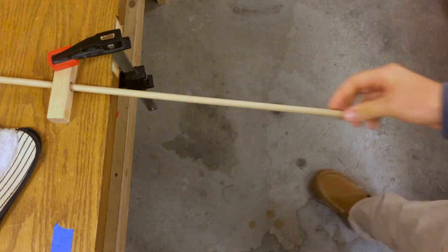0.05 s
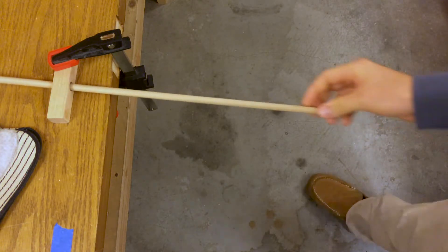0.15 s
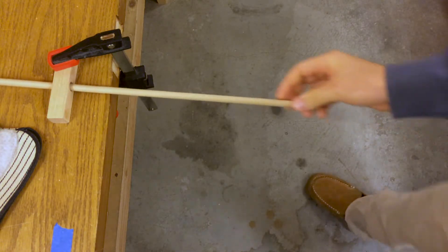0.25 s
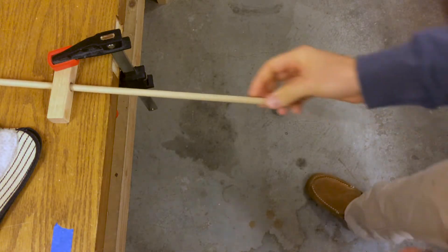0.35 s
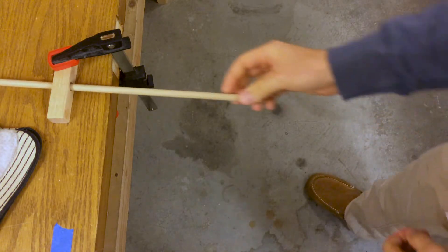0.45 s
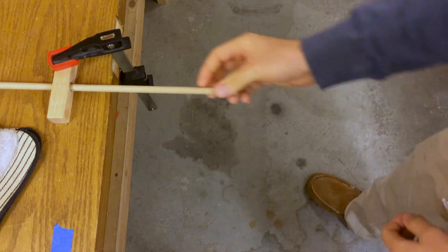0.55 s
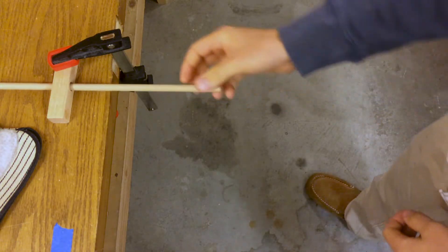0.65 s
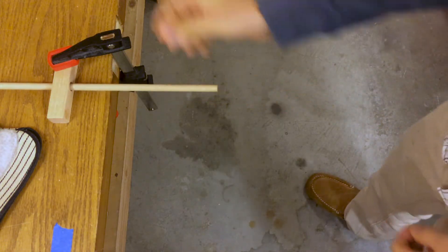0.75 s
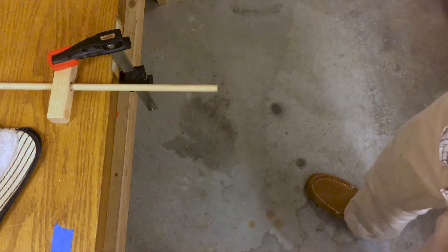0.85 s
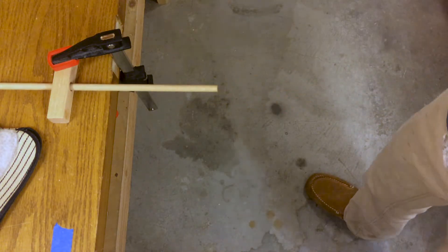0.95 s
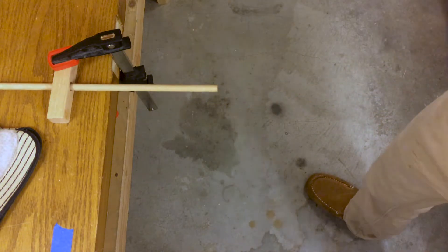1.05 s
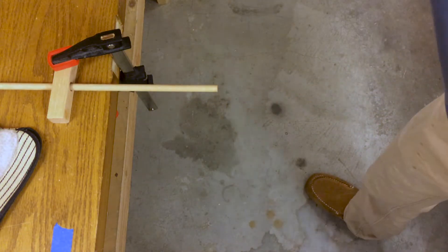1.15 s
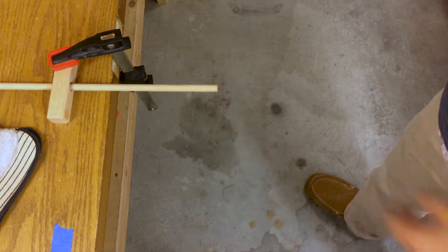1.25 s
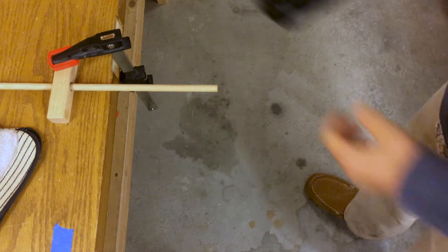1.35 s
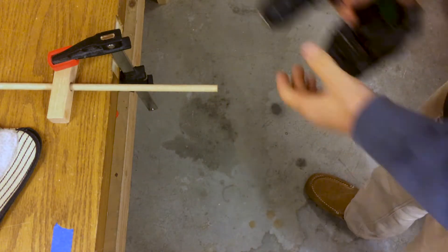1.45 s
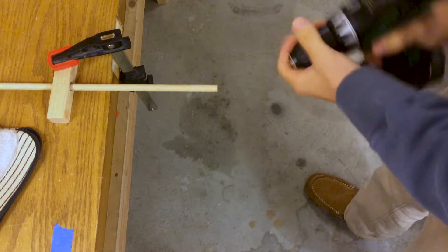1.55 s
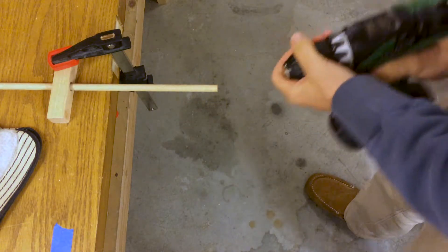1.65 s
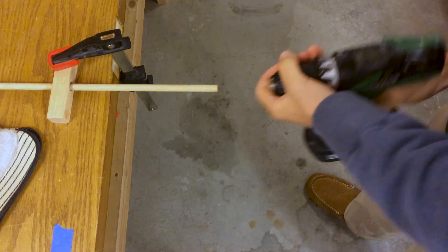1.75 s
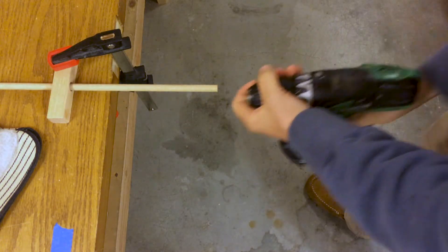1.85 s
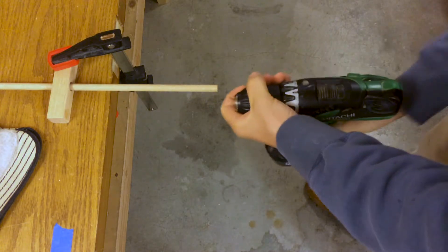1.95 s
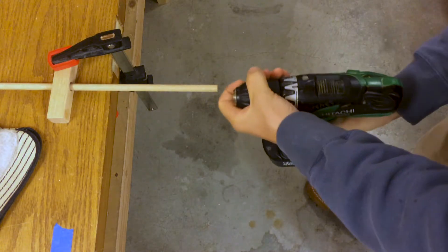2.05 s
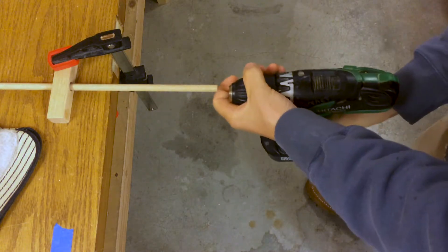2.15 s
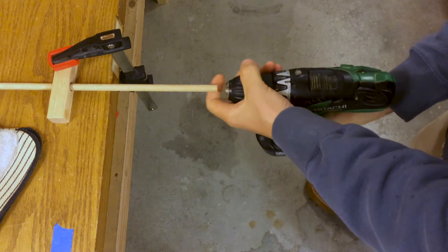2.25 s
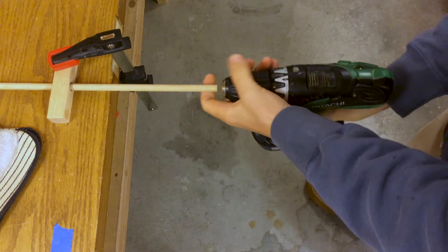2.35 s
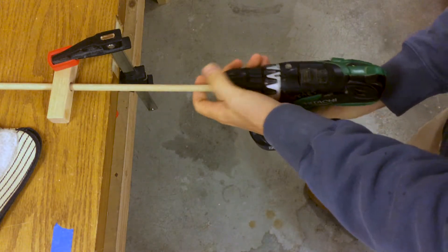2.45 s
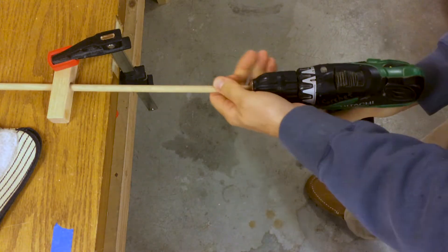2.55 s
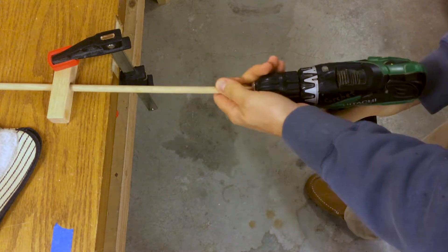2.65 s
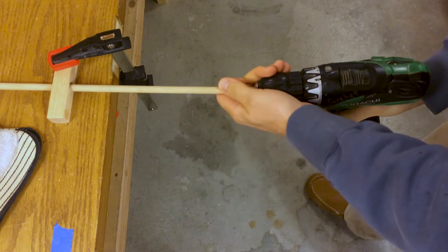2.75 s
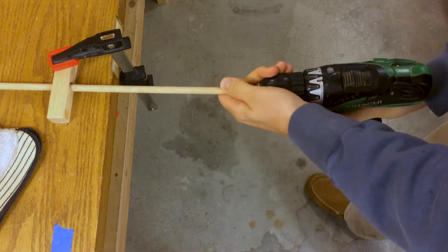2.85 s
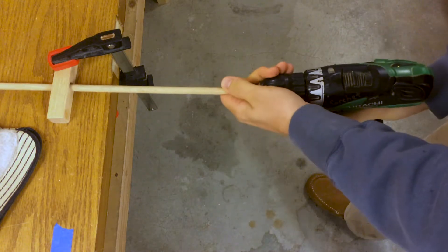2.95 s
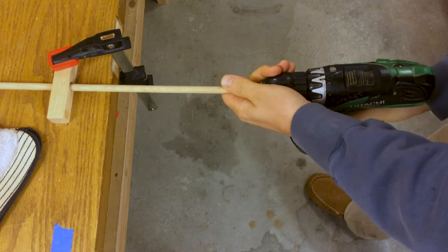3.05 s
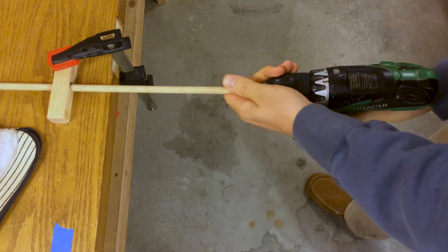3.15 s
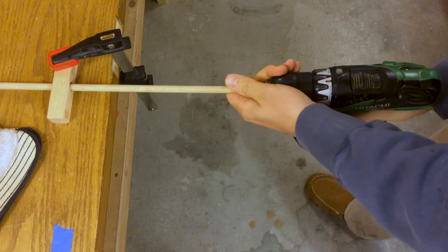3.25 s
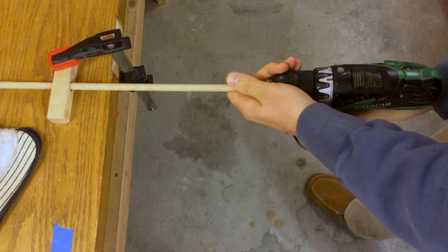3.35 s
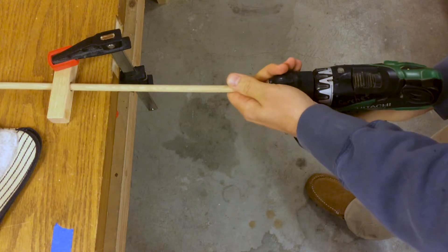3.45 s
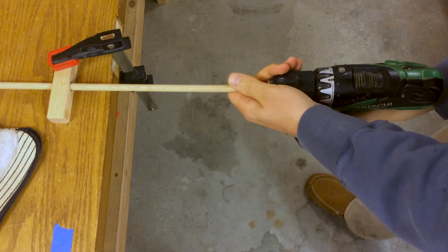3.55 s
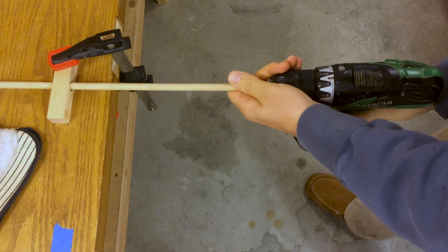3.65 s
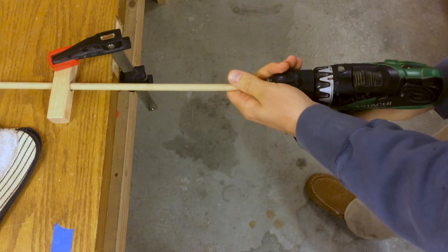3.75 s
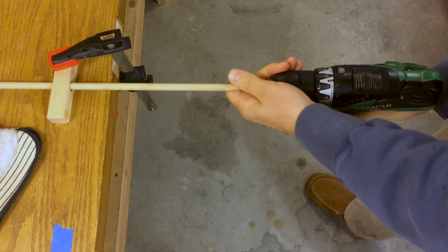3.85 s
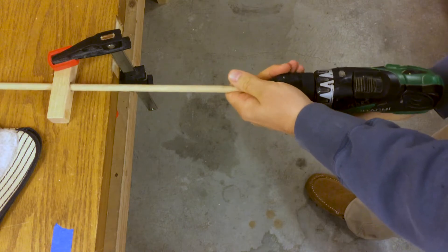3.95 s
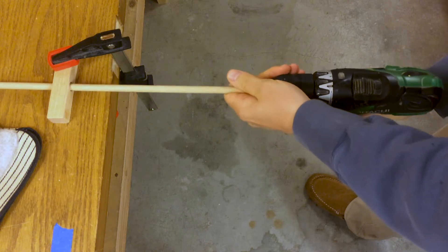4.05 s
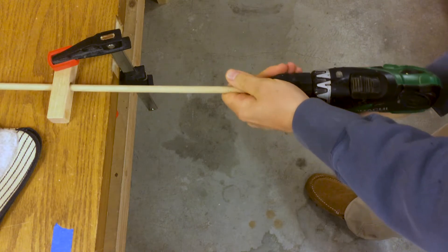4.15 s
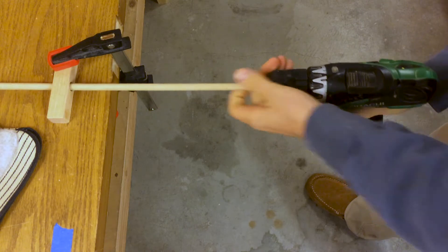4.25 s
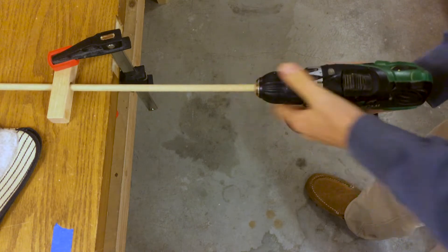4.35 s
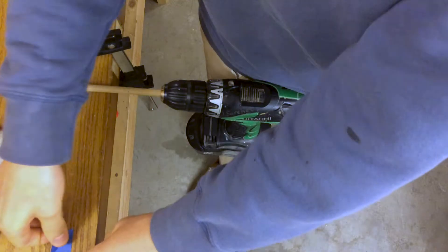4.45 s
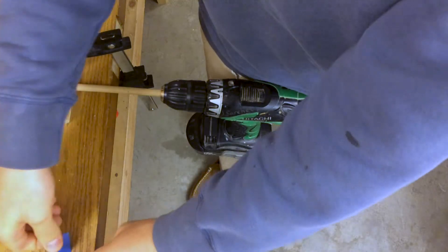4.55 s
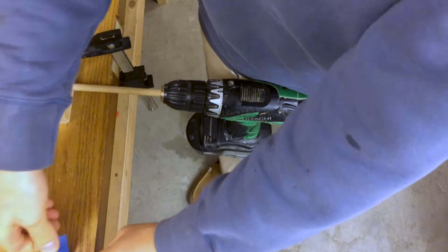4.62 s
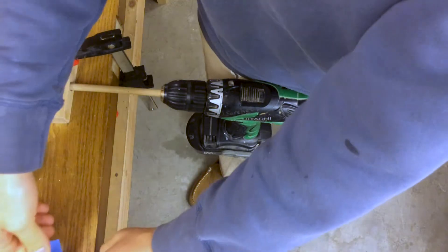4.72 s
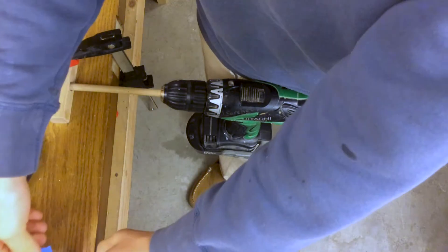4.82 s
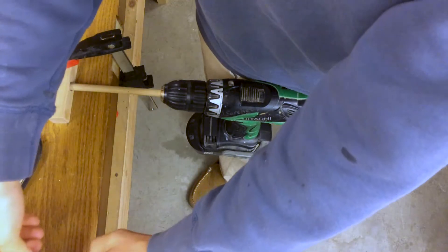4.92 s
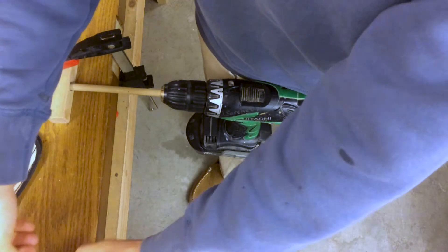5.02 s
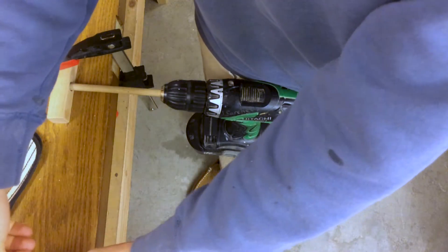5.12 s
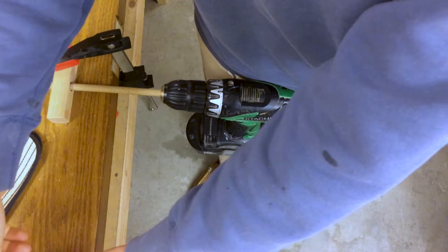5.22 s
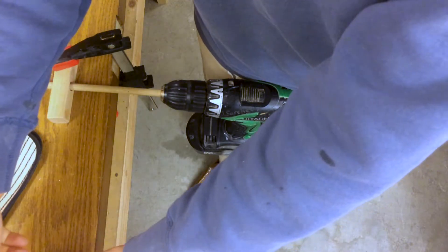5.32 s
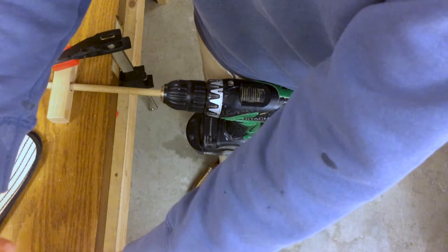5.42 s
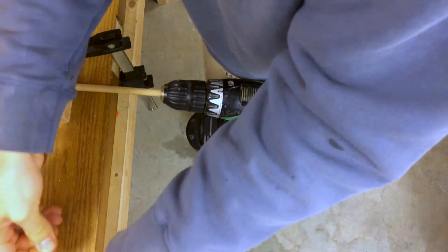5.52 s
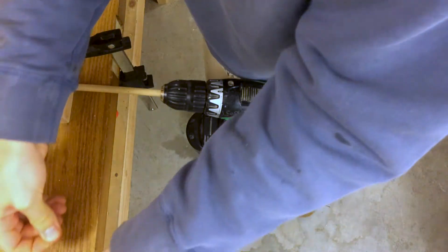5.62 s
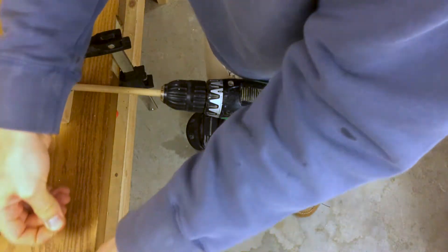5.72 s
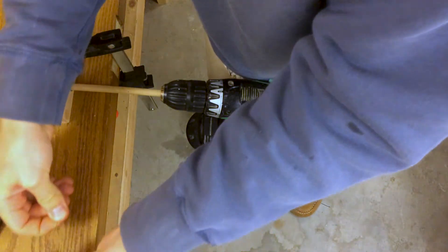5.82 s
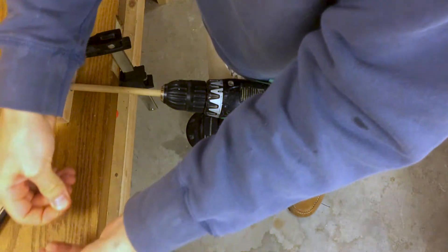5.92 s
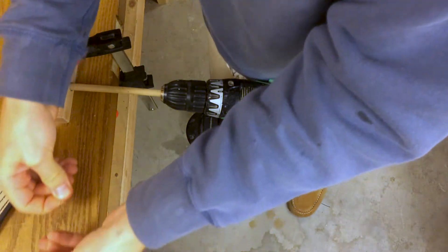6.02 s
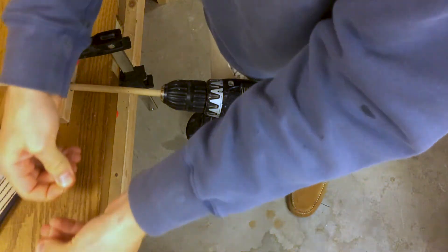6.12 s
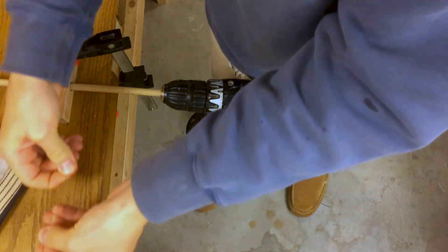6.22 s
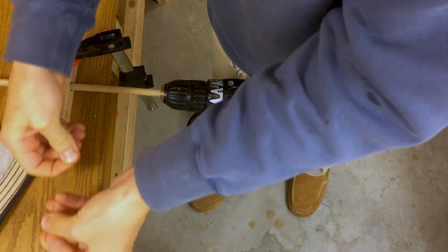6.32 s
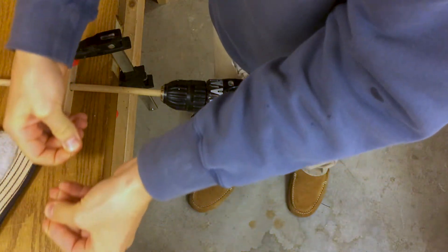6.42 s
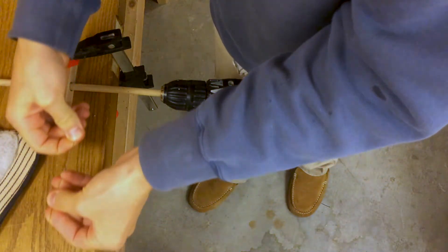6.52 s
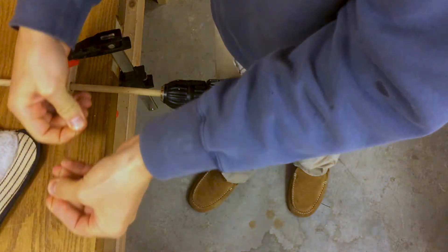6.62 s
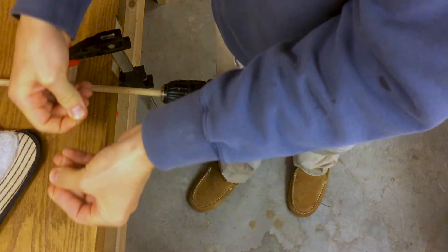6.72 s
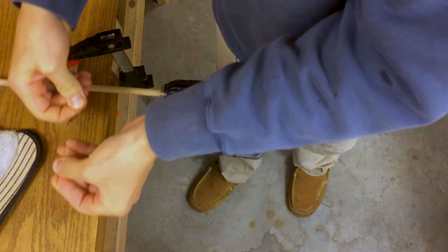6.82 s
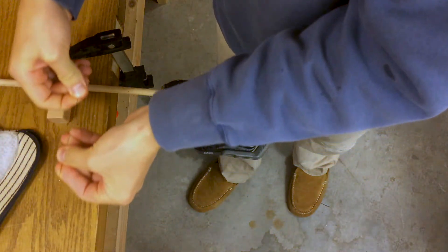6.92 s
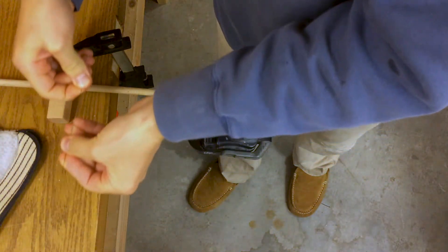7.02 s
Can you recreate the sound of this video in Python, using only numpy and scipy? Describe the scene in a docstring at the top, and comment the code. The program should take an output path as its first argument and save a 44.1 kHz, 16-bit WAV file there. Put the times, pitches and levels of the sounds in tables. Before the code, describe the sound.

Close in a small workshop with faint air and low rumble: a thin dowel scrapes through a wooden block with a wavering, hollow squeak and knocks dryly to a stop. A drill is lifted with a soft thud and sharp plastic clacks. It whirs briefly, clicks, then runs about a second, sagging to a shuddering stall with a short falling squeal. Tape and sleeves rustle and tick quietly.

```python
"""A small workshop: air noise, low rumble and, for a while, the throb of a distant slow machine.
A dowel slides through a clamped block (noise through wood resonances) and knocks home (crack and ringing modes).
A cordless drill is picked up with a thud and clacks, and runs twice (shaped gear roar, brush fuzz, whining lines).
The second run sags under load as the chuck grips the dowel, shaking and squealing; brief rubs come before the
runs, and tape and sleeves rustle and tick afterwards (grainy bands of noise, short bursts)."""
import sys
import numpy as np
from scipy import signal
from scipy.fft import rfft, irfft
from scipy.io import wavfile
from scipy.ndimage import uniform_filter1d

SR = 44100
rng = np.random.default_rng(int(sys.argv[2]) if len(sys.argv) > 2 else 0)


def generate_wav(signal):
    """Clip the signal to [-1, 1] and save it as 16-bit WAV at the path in sys.argv[1]."""
    frames = np.transpose(np.atleast_2d(signal))
    scaled = np.clip(frames, -1, 1) * 32767
    pcm = np.round(scaled).astype(np.int16)
    wavfile.write(sys.argv[1], SR, pcm)


N = 312228  # samples


def gain_of(db):
    """Decibels to amplitude."""
    return 10 ** (np.asarray(db) / 20)


def evened(x):
    """Scales to rms 1."""
    return x / np.sqrt(np.mean(x ** 2) + 1e-20)


def blend(share, a, b):
    """From a to b as the share goes from 0 to 1."""
    return a + (b - a) * np.clip(share, 0, 1)


def read(points, hz):
    """Reads a curve of (f/Hz, value) points along log frequency."""
    f, value = np.transpose(points)
    return np.interp(np.log(hz + 1), np.log(f + 1), value)


def add(mix, start_s, sound):
    """Mixes a sound in from its start time."""
    part = mix[round(start_s * SR):][:len(sound)]
    part += sound[:len(part)]


def play(rows):
    """Start time, columns drawn out to sample rate, and a window with 4 ms edges."""
    s, *columns = np.transpose(rows)
    t = np.arange(s[0], s[-1], 1 / SR)
    edge = np.clip(np.minimum(t - s[0], s[-1] - t) / .004, 0, 1)
    return s[0], [np.interp(t, s, column) for column in columns], edge


def drift(size, rate):
    """Slow random wander of rms 1, changing about rate times a second."""
    b, a = signal.butter(2, rate / SR)
    wander = signal.lfilter(b, a, rng.standard_normal(size + SR))
    return evened(wander[SR:])  # the filter has settled by here


def band_rms(x, lo_hz, hi_hz):
    """Level of x inside a band."""
    hz = np.fft.rfftfreq(len(x), 1 / SR)
    inside = (hz > lo_hz) & (hz < hi_hz)
    return np.linalg.norm(rfft(x)[inside]) * np.sqrt(2) / len(x)


def coloured(x, spectrum, bumps=()):
    """Gives x a spectrum with resonant bumps (f/Hz, width/Hz, height/dB), rms 1."""
    hz = np.fft.rfftfreq(len(x), 1 / SR)
    db = read(spectrum, hz)
    db = db + sum(height / (1 + (2 * (hz - f) / width) ** 2) for f, width, height in bumps)
    return evened(irfft(rfft(x) * gain_of(db), len(x)))


def grains(size, spread_db, rate):
    """Noise whose level jumps about quickly, as from teeth or fibres catching."""
    return rng.standard_normal(size) * gain_of(spread_db * drift(size, rate))


def resonate(x, hz, width):
    """A resonance of gain 1 that may move: shift down to 0 Hz, smooth, shift back up."""
    turn = np.exp(2j * np.pi * np.cumsum(hz * np.ones(len(x))) / SR)
    r = np.exp(-np.pi * width / SR)
    smooth = signal.lfilter([1 - r], [1, -r], x / turn + 1e-18)
    return 2 * (turn * smooth).real


def whistle(x, hz, width):
    """Noise through the same resonance twice for steep sides, rms 1."""
    return evened(resonate(resonate(x, hz, width), hz, width))


def steady(x):
    """Evens out the deepest swells of a ringing mode: friction keeps feeding it."""
    return evened(x / (uniform_filter1d(x ** 2, size=600) + .05) ** 0.17)


def orders(hz, multiples, levels_db, flutter_db, scatter=1):
    """Sines on multiples of a turning speed, each fluttering; little scatter of phase makes a beat each turn."""
    turns = np.cumsum(hz) / SR
    total = 0
    for k, db in zip(multiples, levels_db):
        level = np.sqrt(2) * gain_of(db + flutter_db * drift(len(hz), 61))
        total = total + level * np.cos(2 * np.pi * (k * turns + scatter * rng.random()))
    return total


def tone(rows):
    """A single gliding, fluttering sine."""
    s, (hz, db), edge = play(rows)
    return s, edge * orders(hz, [1], [db], flutter_db=2)


# Dowel sliding: t/s, f of lowest bending mode/Hz, bending level/dB, scrape level/dB, block ringing level/dB
SLIDE = [(0.0, 443, -62, -81, -58), (0.044, 410.5, -64, -51, -59), (0.104, 379, -53.5, -59.5, -56.5),
         (0.198, 505, -60, -60, -58.5), (0.252, 509, -60, -56.5, -62.5), (0.34, 535, -62.5, -58.5, -61.5),
         (0.46, 475, -53, -59, -57), (0.508, 451, -58, -54, -56.5), (0.558, 423, -70, -56, -61.5),
         (0.608, 394, -70, -59, -66.5), (0.63, 394, -72, -77, -65)]
# Bending modes: multiple of the lowest, level/dB
BEND_MODES = [(1, -1.5), (1.9, -3), (2.3, -16)]
# Block resonances: f/Hz, width/Hz, level/dB
BLOCK = [(729, 115, 0), (874, 20, 2), (1044, 160, -3), (1158, 110, -4.5), (1479, 39, -7.5), (1876, 19, -16)]
# Upper modes: f/Hz, width before widening/Hz, level over the scrape/dB
UPPER = [(2490, 33, -14.5), (2856, 34, -22), (3300, 50, -18.5), (3705, 40, -12.5), (4360, 52, -13),
         (4820, 140, -18), (5340, 75, -26), (6400, 82, -28), (6970, 70, -25), (7860, 89, -25),
         (8720, 79, -23), (9800, 120, -34), (12100, 140, -29)]
# Scrape spectrum: f/Hz, relative level per Hz/dB
SCRAPE = [(710, -32), (1200, -9), (1910, 1.5), (2040, -6.5), (4240, -5), (5090, -12), (9020, -12),
          (12300, -19), (15800, -40)]
WAVER_DB, UPPER_WAVER_DB = 2.5, 3.5  # rms level wander of each mode
UPPER_WIDENING = 1.9


def slide():
    """Friction shakes dowel and block: the bending modes glide together with the free length;
    the block and upper modes waver with the grip."""
    s, (hz, bend_db, scrape_db, block_db), edge = play(SLIDE)
    size = len(hz)
    rub = grains(size, spread_db=2.0, rate=130)
    bend, block, upper = np.zeros((3, size))
    for k, db in BEND_MODES:
        level = gain_of(db + WAVER_DB * drift(size, 41))
        bend += level * steady(whistle(rub, k * hz, 21))
    for f, width, db in BLOCK:
        level = gain_of(db + WAVER_DB * drift(size, 33))
        pitch = f * (1 + 0.0194 * drift(size, 15.7))
        block += level * steady(whistle(rub, pitch, width))
    for f, width, db in UPPER:
        level = gain_of(db + UPPER_WAVER_DB * drift(size, 19))
        pitch = f * (1 + 0.012 * drift(size, 11.3))
        upper += level * whistle(rub, pitch, UPPER_WIDENING * width)
    scrape = upper + coloured(rub, SCRAPE)
    return s, edge * (gain_of(bend_db) * bend + gain_of(block_db) * block + gain_of(scrape_db) * scrape)


# Room air: t/s, murmur level/dB, hiss level/dB
AIR = [(0, -62, -60), (.6, -67.5, -101), (1.0, -75, -73.5), (1.25, -68.5, -69.5), (1.45, -72.5, -73.5),
       (1.9, -71, -71), (2.52, -72.5, -77), (2.851, -67, -74), (3.1, -71, -73.5), (4.25, -59, -62),
       (4.451, -70.5, -72.5), (4.7, -66.5, -67), (4.95, -62, -63), (5.15, -72, -72.5), (5.55, -77, -78.5),
       (5.59, -64.5, -69.5), (6.0, -65, -69), (7.08, -64, -69.5)]
# Murmur spectrum: f/Hz, relative level per Hz/dB
MURMUR = [(120, -6), (200, 1), (248, -17), (301, 2), (433, -7.5), (477, 3), (514, -5), (765, -6),
          (928, -5.5), (1690, -8.5), (2030, -17.5), (2600, -29), (3380, -53), (5720, -120)]
# Hiss spectrum: f/Hz, relative level per Hz/dB
HISS = [(1180, -61), (2000, 0), (2610, -2.5), (3220, -7), (3600, -5), (3890, -3), (5050, -6), (5900, -5),
        (6540, -4.5), (10200, -9), (11500, -12.5), (14600, -14.5), (15800, -19)]
# Faint bands in the hiss: f/Hz, width/Hz, height/dB
HISS_BANDS = [(3220, 470, 7.5), (3870, 460, 3), (5750, 500, 2), (4930, 270, 0)]


def air():
    """A patchy murmur and a smooth hiss, both shaped noise riding their own level curves."""
    s, *columns = np.transpose(AIR)
    murmur_db, hiss_db = (np.interp(np.arange(N) / SR, s, column) for column in columns)
    patchy = grains(N, spread_db=1, rate=30)
    smooth = grains(N, spread_db=.5, rate=60)
    return gain_of(murmur_db) * coloured(patchy, MURMUR) + gain_of(hiss_db) * coloured(smooth, HISS, HISS_BANDS)


# Low rumble of the building: t/s, level/dB
LOWS = [(0, -59), (.6, -59), (.668, -55.5), (.92, -59), (1.27, -56.5), (1.31, -63), (1.72, -62),
        (1.89, -63), (1.965, -74), (2.02, -61.5), (2.4, -62.5), (2.52, -71), (2.535, -51.5), (3.95, -52),
        (4.28, -60), (4.43, -51.5), (4.445, -65.5), (4.87, -57.5), (5.24, -62), (5.9, -65.5), (6.3, -64),
        (7.08, -64)]
# Rumble spectrum: f/Hz, relative level per Hz/dB
RUMBLE = [(12, -24), (20, -9.5), (70, 9.5), (91, 2.5), (124, 6), (150, -6), (189, -4.5), (300, -15),
          (390, -18), (660, -120)]


def rumble():
    """Lumpy low noise whose level rises and falls."""
    s, (db,), edge = play(LOWS)
    lumps = grains(len(db), spread_db=2.0, rate=19)
    return s, edge * gain_of(db) * coloured(lumps, RUMBLE)


# Dowel knocking home: t/s, crack peak level/dB, ring against crack level/dB, top of crack band f/Hz
KNOCKS = [(0.632, -25.5, -5, 4400), (0.639, -24, -2, 4600), (0.662, -29.5, -4, 4100),
          (0.669, -39.5, 7, 4000)]
# Modes of the struck dowel and block: f/Hz, level before random scatter/dB, t60/s
WOOD = [(350, 3.5, 0.03), (560, -6, 0.07), (714, 5.5, 0.034), (826, 3.5, 0.032), (1123, 9.5, 0.032),
        (1260, 10.5, 0.019), (1310, -2, 0.017), (1760, 13.5, 0.0091), (1920, -4.5, 0.056), (2300, -4, 0.02),
        (2730, -8, 0.018), (3360, -18, 0.02), (3700, -11, 0.021)]


def knock(peak_db, ring_db, bright_hz):
    """A dry crack, and the wood rings in decaying modes; second row: the same again, to go round the room."""
    t = np.arange(SR // 4) / SR
    crack = rng.standard_normal(len(t)) * gain_of(-60 * t / .012) * (1 - np.exp(-t / .0003))
    crack = signal.lfilter(*signal.butter(2, [800, bright_hz], "bandpass", fs=SR), crack)
    ring = np.zeros(len(t))
    for hz, db, t60 in WOOD:
        level = gain_of(db + 2 * rng.standard_normal() - 60 * t / t60)
        ring += level * np.sin(2 * np.pi * (hz * t + rng.random()))
    ring = ring * (1 - np.exp(-t / .001))
    hit = crack / abs(crack).max() + gain_of(ring_db) * ring / abs(ring).max()
    return gain_of(peak_db) * np.array([hit, hit])


# Soft shuffles and bumps: t of the swell's top/s, level/dB, time to fade 20 dB/s, boom f/Hz, boom height/dB
SHUFFLES = [(.72, -47, 0.17, 310, 11), (2.56, -55, 0.21, 920, -1), (2.71, -59, 0.14, 800, 9),
            (4.639, -56, 0.048, 900, -1), (4.82, -64, 0.061, 900, 3), (5.601, -63.5, 0.22, 302, 32),
            (6.279, -57.5, 0.27, 534, 12)]
# Scuff spectrum: f/Hz, relative level per Hz/dB
SCUFF = [(120, -47), (250, -11), (520, 0), (900, 2), (1700, -4.5), (2600, -10.5), (5000, -18), (15800, -26)]
SHUFFLE_RISE_S = .035  # time to rise 20 dB


def shuffle(s, db, fade, boom_hz, boom_db):
    """A dull scuff of grainy noise that swells and fades, with one booming band."""
    t = np.arange(-2 * SHUFFLE_RISE_S, 2 * fade, 1 / SR)
    boom = (boom_hz, boom_hz / 2, boom_db)
    scuff = coloured(grains(len(t), spread_db=1.0, rate=130), SCUFF, [boom])
    swell_db = -20 * abs(t) / np.where(t < 0, SHUFFLE_RISE_S, fade)
    return s + t[0], gain_of(db + swell_db) * scuff


# Rubs of tape and sleeves: t/s, length before the tail/s, starting fizz level/dB, starting squeak level/dB, squeak f/Hz
RUBS = [(1.234, 0.078, -72, -74, 3240), (1.378, 0.058, -73, -49, 3100), (1.45, .04, -75, -72, 3200),
        (4.509, 0.074, -64.5, -85, 3840), (4.536, 0.091, -80, -57, 3700), (4.584, 0.16, -57.5, -51, 3680),
        (4.741, .14, -56, -55, 3180), (4.882, 0.13, -58.5, -76, 3960), (5.03, 0.17, -62, -67, 4430),
        (5.126, 0.056, -53.5, -74, 4600), (5.196, 0.23, -74, -68.5, 4400), (5.468, 0.061, -66, -70, 4100),
        (5.52, 0.024, -64, -55.5, 3860)]
# Fizz spectrum: f/Hz, relative level per Hz/dB
FIZZ = [(2650, -37), (4500, 2.5), (6730, -5), (7360, 3), (8800, 5.5), (9470, 3), (10700, 4), (12500, 1),
        (16200, -54), (22000, -120)]
RUB_RISE_S, RUB_TAIL_S = 0.013, .03
FIZZ_FADE_DB, SQUEAK_FADE_DB = -8, -18.5  # change over the length of the rub
SIZZLE_DB = -9  # over the fizz


def rustle(s, length, fizz_db, squeak_db, hz):
    """Crackling fizz of fibres in patches, a thin sizzle above it and a squeaky band where tape rubs."""
    t = np.arange(0, length + RUB_TAIL_S, 1 / SR)
    stroke = np.clip(np.minimum(t / RUB_RISE_S, (t[-1] - t) / RUB_TAIL_S), 0, 1)
    low_fibres, high_fibres = (
        grains(len(t), spread_db=2.5, rate=350) * gain_of(0.28 * drift(len(t), 66)) for _ in range(2))
    pitch = hz * (1 + 0.055 * drift(len(t), 30))
    squeak = whistle(grains(len(t), spread_db=3.0, rate=640), pitch, 1500)
    fizz = coloured(low_fibres, FIZZ) + gain_of(SIZZLE_DB) * whistle(high_fibres, 14000, 3500)
    fizz = gain_of(fizz_db + FIZZ_FADE_DB * t / length) * fizz
    squeak = gain_of(squeak_db + SQUEAK_FADE_DB * t / length) * squeak
    return s, stroke * (fizz + squeak)


# Low thud as the drill leaves the bench: t/s, f/Hz, level/dB
THUD = [(1.27, 70, -66), (1.285, 72, -41.5), (1.295, 71, -43), (1.305, 67, -68)]


def thud():
    """One short low sine."""
    return tone(THUD)


# Plastic clacks and small ticks: t/s, peak level/dB, ring f/Hz, ring height/dB, tilt/dB per octave
CLACKS = [(1.34, -47.5, 1850, 12, -1.5), (1.349, -48, 1760, 38, -3), (1.384, -43, 1720, 27, 4.5),
          (1.396, -45, 1760, 32, 0), (1.408, -48, 2500, 11, 1), (1.458, -45.5, 6100, 3, -0.5),
          (1.537, -54, 1910, 12, -1), (1.642, -31, 4000, 2, -5.5), (1.644, -16, 3800, 9, 3.5),
          (1.6538, -14, 5740, 12.5, -0.8), (1.6556, -19.5, 6070, 21, -2), (1.681, -27.5, 6100, 27, -6.5),
          (1.994, -45, 3170, 4, -1), (2.024, -33, 2300, 6, -3), (2.537, -41.5, 1700, 0, -7),
          (2.571, -42, 1830, 9, 2.5), (2.903, -16.5, 4470, 7, 0.7), (2.945, -20.5, 4670, 6, 1.5),
          (3.186, -36.5, 3220, 3, -4.5), (4.434, -50.5, 1300, -4, -6)]
# Tape ticks, close and dry: t/s, peak level/dB, ring f/Hz, ring height/dB, tilt/dB per octave
TICKS = [(4.592, -31.5, 8400, 21, 1.5), (4.775, -40, 9100, 17, -5.5), (4.9, -37, 9100, 12, -1.4),
         (4.984, -46, 12000, 19, 6), (5.093, -42, 11000, 13, 3.5), (5.121, -41, 9100, 30, -5),
         (5.136, -38.5, 9300, 33, -2), (5.144, -46, 9100, 19, -5), (5.156, -43, 9100, 19, -2),
         (5.166, -38, 8250, 30, -2), (5.215, -35, 7550, 15, 7), (5.2405, -41.5, 7300, 10, 7),
         (5.292, -47.5, 7400, 11, 7), (5.478, -56, 7000, 3, 3), (5.495, -50, 9000, 8, 1),
         (5.526, -42, 6140, 7, 3.5)]
# Clack spectrum before tilt and ring: f/Hz, relative level per Hz/dB
CLACK_BAND = [(150, -43), (350, -10), (600, -5), (1850, 3.5), (9100, -3), (13000, -10), (20000, -23)]
# Repeats of the burst, a rebound and then a reflection off the floor: delay/s, level against the first burst/dB
REPEATS = [(.003, -15.5), (.0057, -10.5)]
CLACK_RISE_S, RISE_FALLS = 0.00078, 0.79  # rise at a 4 kHz ring; higher ones are quicker by this power of pitch
RING_SHARE = 0.55  # ring width as a share of its pitch


def clack(peak_db, ring_hz, ring_db, tilt_db):
    """A burst that swells, dies in a few ms, rebounds once and comes back off the floor; second row: the smooth
    pulse it sends round the room."""
    colour = [(hz, db + tilt_db * np.log2(hz / ring_hz)) for hz, db in CLACK_BAND]
    ring = [(ring_hz, RING_SHARE * ring_hz, ring_db)]
    rise_s = CLACK_RISE_S * (4000 / ring_hz) ** RISE_FALLS
    u = np.arange(SR // 16) / SR / rise_s  # time in rises
    burst = coloured(rng.standard_normal(len(u)), colour, ring) * (u * np.exp(-u)) ** 0.72
    burst = burst + sum(gain_of(db) * np.roll(burst, round(s * SR)) for s, db in REPEATS)
    burst = gain_of(peak_db) * burst / abs(burst).max()
    pulse = coloured(signal.unit_impulse(len(u), idx=100), colour, ring)
    return np.array([burst, pulse * np.sqrt(np.mean(burst ** 2))])


# First motor run: t/s, whine f/Hz, gear roar level/dB, strength of the whine/dB
OPEN_RUN = [(2.0, 479, -70.5, -12), (2.05, 490, -41, -18), (2.108, 666, -40.5, -4), (2.146, 738, -38, 2),
            (2.18, 765, -39, -4), (2.24, 749.5, -39.5, 6), (2.31, 785, -40.5, 0), (2.352, 728, -39.5, 9),
            (2.39, 766, -62, -5)]
# Its whining lines: multiple of the whine, level over the roar when free/dB, when labouring/dB, before strength
OPEN_ORDERS = [(.999, -9.5, -13), (1.743, -10.5, -32), (3.551, -15, -23), (4.95, -10, -31)]
# Second motor run, gripping the dowel: t/s, whine f/Hz, gear roar level/dB, strength of the whine/dB
GRIP_RUN = [(3.17, 428.5, -68, -5), (3.21, 523.6, -47, -6), (3.26, 604, -42, 3), (3.31, 705.6, -42, -0.5),
            (3.38, 735, -42, -2.5), (3.55, 737.7, -42.5, -3), (3.73, 736, -42.5, -5.5),
            (3.8, 698, -42.5, 3), (3.87, 679, -43, -4), (3.99, 647, -41, 1.5), (4.09, 615, -42.5, 0.5),
            (4.125, 539, -41.5, 2), (4.19, 402, -44.5, -10), (4.25, 303.7, -54.5, -8)]
# Its whining lines: multiple of the whine, level over the roar when free/dB, when labouring/dB, before strength
GRIP_ORDERS = [(.825, -14.5, -11), (1.001, -14, -30), (1.65, -31.5, -26), (2.0, -9, -12.5), (3.65, -25, -6),
               (4.999, -12, -43), (5.47, -27.5, -7)]
# Gear roar spectrum: f/Hz, relative level per Hz/dB
ROAR = [(150, -45), (250, -17), (428, -5.5), (555, -6), (918, -1.5), (1110, 0.5), (2430, 0.5), (2840, -1.5),
        (3810, 1), (6190, -8.5), (9720, -6.5), (14700, -20), (15800, -15)]
# Casing resonances: f/Hz, width/Hz, height/dB
CASING = [(1120, 160, 3), (2540, 120, 7.5), (3770, 290, 5), (5170, 990, 4.5), (7400, 1900, 4),
          (12870, 2100, 7.5)]
FREE_HZ, LABOUR_HZ, STALL_HZ = 692, 659, 520  # marks on the whine; the first two set how far a sag is labour
BRUSH_FREE_DB, BRUSH_LABOUR_DB, BRUSH_STALL_DB = -7.5, -21, -70  # brush band over the roar, before each run's trim
SMEAR_DB_PER_KHZ_S = -0.37  # a line that glides fast is lost in the roar


def drill(rows, lines, treble_db, brush_db):
    """Gear roar in the casing and a fuzzy band from the brushes; apart from them, whining lines on the shaft speed."""
    s, (hz, roar_db, whine_db), edge = play(rows)
    size = len(hz)
    labour = (np.maximum.accumulate(hz) - hz) / (FREE_HZ - LABOUR_HZ)  # sag below the top speed so far

    roar = coloured(grains(size, spread_db=1.0, rate=250), ROAR, CASING)
    roar = roar / band_rms(roar, 600, 6000)
    body = signal.sosfiltfilt(signal.butter(2, 6000, fs=SR, output="sos"), roar)
    treble = np.minimum(hz / 640, 1) ** 3.4 * (roar - body)  # slow gears lose their treble
    roar = gain_of(roar_db) * (body + gain_of(treble_db) * treble)

    brush_over_roar_db = np.interp(
        hz, [STALL_HZ, LABOUR_HZ, FREE_HZ], [BRUSH_STALL_DB, BRUSH_LABOUR_DB, BRUSH_FREE_DB])
    fuzz = whistle(grains(size, spread_db=2.2, rate=100), 9620 * (hz / 740) ** .15, 620)
    brush = gain_of(brush_db + roar_db + brush_over_roar_db) * fuzz

    glide = abs(uniform_filter1d(np.gradient(hz), size=1500)) * SR / 1000  # kHz per second
    lines_db = [roar_db + whine_db + blend(labour, free_db, labour_db) + SMEAR_DB_PER_KHZ_S * k * glide
                for k, free_db, labour_db in lines]
    speed = hz * (1 + .001 * drift(size, 60))
    whine = orders(speed, [k for k, *_ in lines], lines_db, flutter_db=3.0)
    whine = np.minimum(hz / 590, 1) ** 4 * whine  # weak at low speed
    return s, edge * (roar + brush), edge * whine


# Distant machine: t/s, load (0 to about 2), level trim/dB
THROB = [(2.53, 0.45, -4), (2.7, 0.28, -3.5), (2.9, 0.91, -9), (3.0, 0.96, -3), (3.24, 0.93, -2.5),
         (3.52, 1.82, 3), (3.65, 2.11, -3), (3.95, 1.71, 1.5), (4.17, 2, -6), (4.28, 1.5, -8),
         (4.38, 2.1, -9), (4.44, 2, -7)]
# Its turning speed: t/s, turns per s
TURNS = [(2.53, 23.5), (2.75, 23.4), (2.92, 22.6), (3.3, 23.35), (3.65, 23.35), (3.95, 23.7), (4.44, 23.2)]
# Its orders: multiple of the turning speed, level before trim at load 0/dB, at load 1/dB, at load 2/dB
THROB_ORDERS = [(2, -54, -60, -46.5), (3, -77, -83, -53), (4, -63, -57, -41.5), (5, -70, -75, -46),
                (6, -63.5, -46, -53), (7, -63, -60.5, -53.5), (8, -62.5, -56, -79), (9, -69, -64, -62)]


def throb():
    """Low orders of a slow machine; their balance shifts with its load."""
    s, (load, db), edge = play(THROB)
    hz = np.interp(s + np.arange(len(db)) / SR, *np.transpose(TURNS))
    multiples = [k for k, *_ in THROB_ORDERS]
    levels_db = [db + np.interp(load, range(3), by_load_db) for _, *by_load_db in THROB_ORDERS]
    return s, edge * orders(hz, multiples, levels_db, flutter_db=1.0, scatter=0.38)


# The chuck shakes the bench as it stalls: t/s, f/Hz, level/dB
SHAKE = [(4.0, 96.4, -58), (4.05, 92.5, -43.5), (4.12, 80.6, -44.5), (4.17, 78, -38), (4.22, 76, -53),
         (4.27, 75.7, -69)]


def shake():
    """A low sine that sinks in pitch."""
    return tone(SHAKE)


# The chuck squeals as it locks: t/s, f/Hz, level/dB
SQUEAL = [(4.098, 2275, -62), (4.112, 2090, -44), (4.13, 1880, -40.5), (4.148, 1670, -36.5),
          (4.162, 1642, -50)]
# Squeal harmonics 1, 2 and 3: level/dB
SQUEAL_DB = [-7, 0, -9]


def squeal():
    """Three harmonics on a falling pitch that trembles quickly."""
    s, (hz, db), edge = play(SQUEAL)
    pitch = hz * (1 + .022 * drift(len(hz), 300))
    return s, edge * gain_of(db) * orders(pitch, [1, 2, 3], SQUEAL_DB, flutter_db=3)


# Room decay: f/Hz, t60/s
ROOM = [(300, 0.28), (1000, 0.23), (3000, 0.25), (7000, 0.19), (14000, 0.19)]
FRAME = 256  # samples in a frame of the decay shaping


def room(x):
    """Sparse taps of random sign, each band dying at its own speed."""
    taps = np.zeros(SR)
    at = np.arange(160, SR - 5, 5)
    at = at + rng.integers(0, 5, len(at))
    taps[at] = rng.choice([-1., 1.], len(at))
    hz, t, z = signal.stft(taps, SR, nperseg=FRAME)
    decay = gain_of(-60 * t / read(ROOM, hz)[:, None])
    tail = signal.istft(z * decay, SR, nperseg=FRAME)[1]
    return signal.fftconvolve(x, tail / np.linalg.norm(tail))[:N]


def scene():
    """Near sounds with their room, over the air, the rumble and the distant machine."""
    near, whine, hits, hits_to_room, far = np.zeros((5, N))
    add(near, *slide())
    add(far, *rumble())
    for strike, table, room_db in ((knock, KNOCKS, -1.5), (clack, CLACKS, -3), (clack, TICKS, -9)):
        for s, *row in table:
            direct, spread = strike(*row)
            add(hits, s, direct)
            add(hits_to_room, s, gain_of(room_db) * spread)
    for row in SHUFFLES:
        add(far, *shuffle(*row))
    for row in RUBS:
        add(near, *rustle(*row))
    add(far, *thud())
    open_run = drill(OPEN_RUN, OPEN_ORDERS, treble_db=5.5, brush_db=-10.0)
    grip_run = drill(GRIP_RUN, GRIP_ORDERS, treble_db=5.0, brush_db=1.5)
    for s, roar, lines in (open_run, grip_run):
        add(near, s, roar)
        add(whine, s, lines)
    add(far, *throb())
    add(far, *shake())
    add(near, *squeal())
    to_room = gain_of(-9.0) * near + gain_of(-20) * whine + hits_to_room
    return (near + whine + hits + room(to_room) + far + air())[None]


def record(dry):
    """Rolls off everything above 15.6 kHz with a steep low-pass."""
    low_pass = signal.firwin(511, 15600, window=("kaiser", 9), fs=SR)
    return signal.oaconvolve(dry, low_pass[None], "same")


dry = scene()
out = record(dry)
generate_wav(out)
```